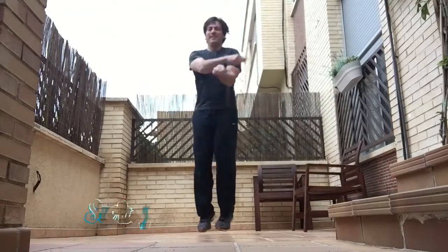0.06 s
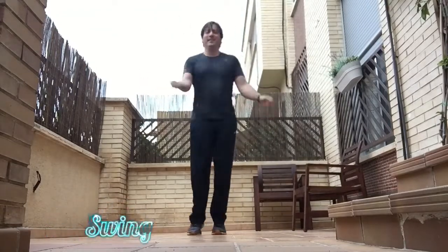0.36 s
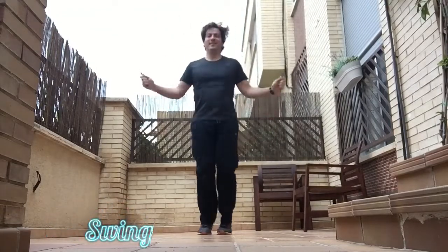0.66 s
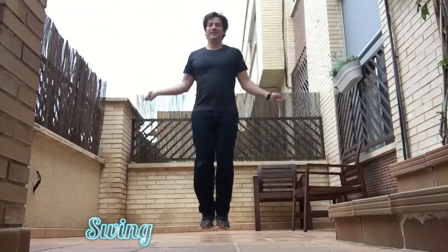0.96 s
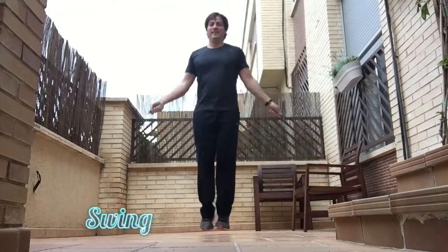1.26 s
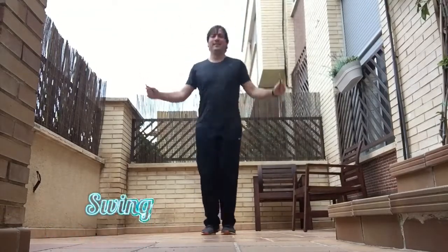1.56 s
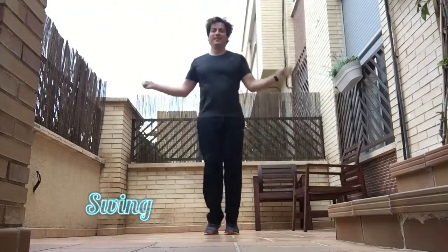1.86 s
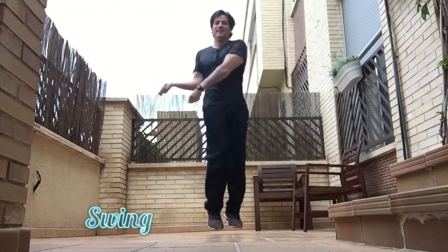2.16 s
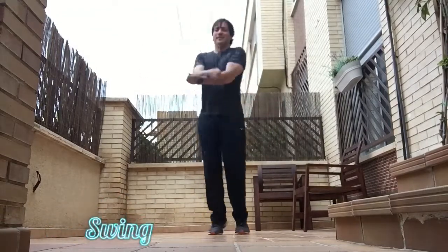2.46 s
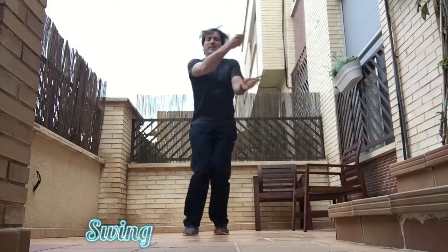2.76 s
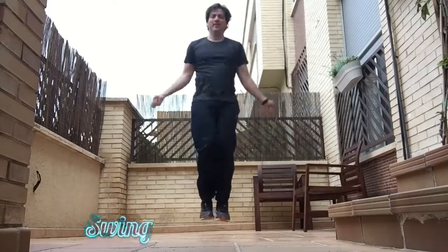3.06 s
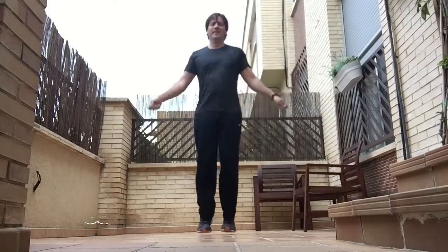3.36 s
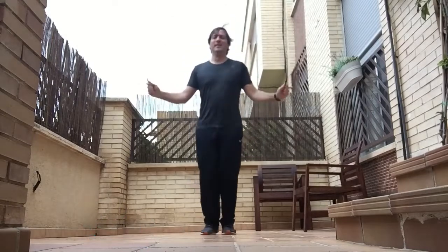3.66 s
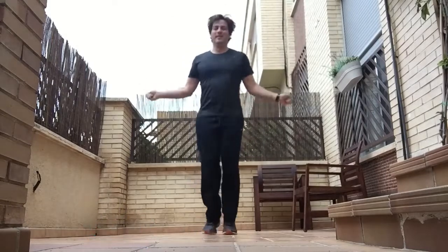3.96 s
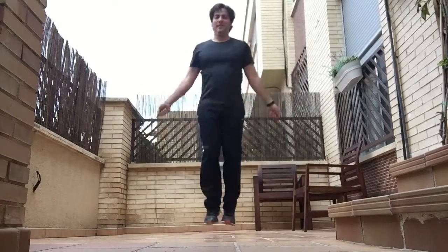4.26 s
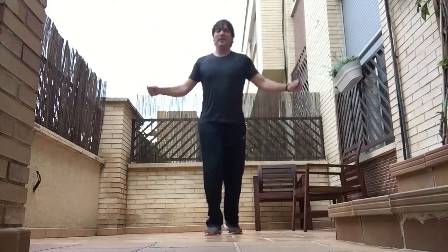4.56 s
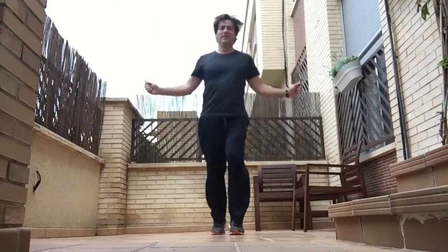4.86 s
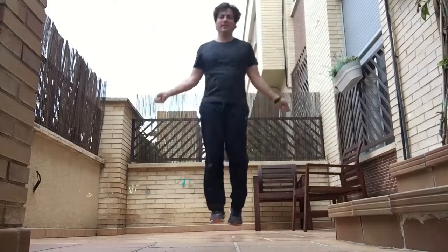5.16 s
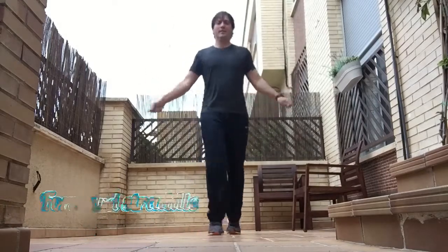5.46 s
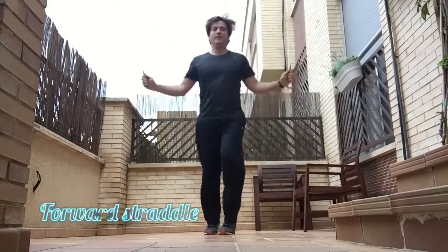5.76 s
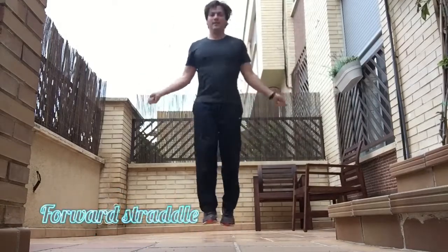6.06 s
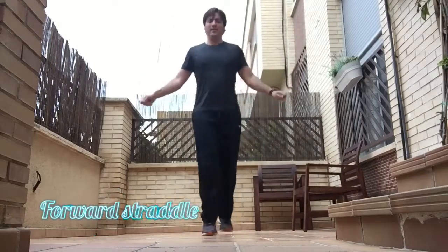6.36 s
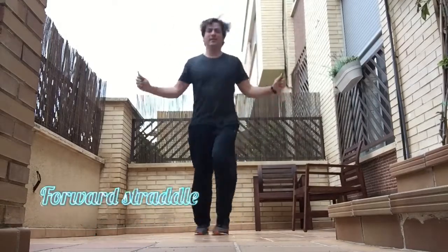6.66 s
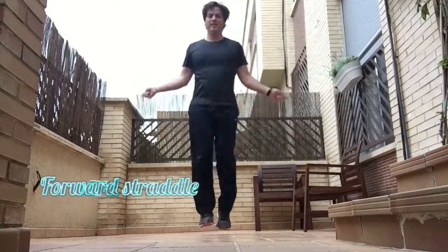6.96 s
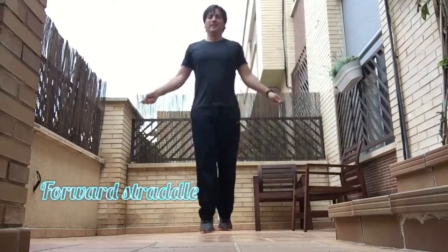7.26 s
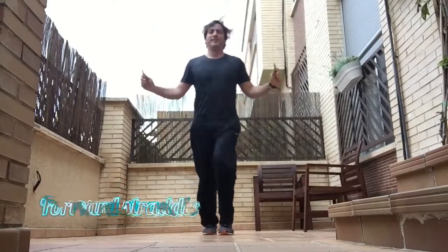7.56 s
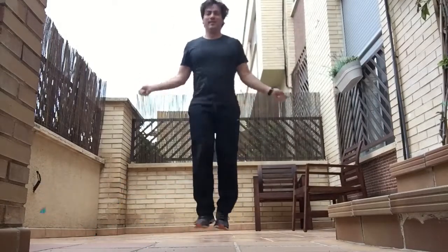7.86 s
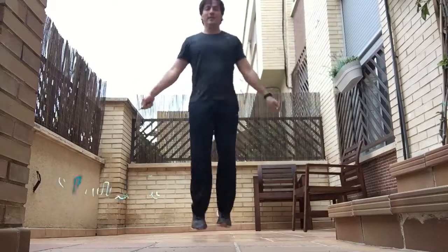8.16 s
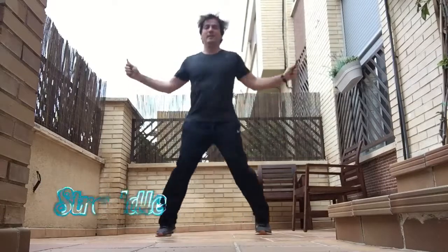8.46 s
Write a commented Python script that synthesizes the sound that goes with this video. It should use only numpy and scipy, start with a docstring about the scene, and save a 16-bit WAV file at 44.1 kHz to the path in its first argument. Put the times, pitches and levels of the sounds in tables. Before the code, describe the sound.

Someone skips rope on a tiled patio at a steady pace, a little over two turns a second. Each turn brings a breathy, whistling swish, a sharp tick on the tiles and the light thud of two shoes. One hard slap near the start jolts the microphone with a thump. Soles scuff and clothes rustle softly, brick walls return short echoes, and a faint town rumble and a few bird chirps lie far behind.

```python
"""A rope swishes round and ticks on a tiled patio, and two shoes land after each tick: someone is skipping.
The rope sings because it leaves tiny swirls in the air. Its hardest slap jolts the microphone.
Soles scuff, clothes rustle, and brick walls throw back short echoes.
Far away a town rumbles and small birds chirp."""
import sys
import numpy as np
from scipy import signal
from scipy.fft import rfft, irfft, next_fast_len
from scipy.io import wavfile
from scipy.ndimage import uniform_filter1d

SR = 44100
rng = np.random.default_rng(int(sys.argv[2]) if len(sys.argv) > 2 else 0)


def waveform_to_disk(signal):
    """Save audio, clipped to [-1, 1], as 16-bit WAV at the path in sys.argv[1]."""
    frames = np.transpose(np.atleast_2d(signal))
    scaled = np.clip(frames, -1, 1) * 32767
    samples = np.round(scaled).astype(np.int16)
    wavfile.write(sys.argv[1], SR, samples)


N = 384552


def amp(db):
    """Turn decibels into a gain."""
    return 10 ** (np.asarray(db) / 20)


def unit(x):
    """Scale a signal to an average (rms) level of 1."""
    return x / np.sqrt(np.mean(np.abs(x) ** 2) + 1e-20)


def along(points, hz):
    """Read between (freq_hz, value) points on a log frequency axis."""
    freqs, values = np.transpose(points)
    return np.interp(np.log(hz + 1), np.log(freqs), values)


def clock(length_s):
    """The time of each sample, in seconds."""
    return np.arange(int(length_s * SR)) / SR


def add(track, start_s, sound):
    """Mix a sound into a track."""
    part = track[round(start_s * SR):][:len(sound)]
    part += sound[:len(part)]


def bump(peak_s, rise_s, fall_s):
    """A smooth swell that reaches 1 at peak_s."""
    t = np.arange(-SR // 2, SR // 2) / SR
    out = np.zeros(N + SR)
    add(out, peak_s + .5, np.exp(-(t / np.where(t < 0, rise_s, fall_s)) ** 2))
    return out[SR:]


def noise(spectrum, size):
    """Noise with the given tone colour, at a level near 1."""
    padded = next_fast_len(size + 8192)
    gain = amp(along(spectrum, np.fft.rfftfreq(padded, 1 / SR)))
    return unit(irfft(rfft(rng.standard_normal(padded)) * gain, padded))[:size]


def colour(force, spectrum, size=4096):
    """Give a burst a tone colour and the energy of 4 ms at level 1."""
    # a minimum-phase filter: nothing sounds before the hit
    cepstrum = irfft(np.log(amp(along(spectrum, np.fft.rfftfreq(size, 1 / SR)))))
    response = irfft(np.exp(rfft(np.r_[cepstrum[0], 2 * cepstrum[1:size // 2]], size)))
    sound = signal.fftconvolve(force, response)
    return sound / np.linalg.norm(sound) * np.sqrt(.004 * SR)


# How long the walls' echoes last: freq_hz, fade_s (every fade_s is the time to drop by 60 dB)
WALL_FADES = [(150, 0.26), (700, 0.29), (3000, 0.27), (8000, 0.23), (15000, 0.2)]

def patio_echoes(build_s=0.0075, roughness=0.34, far_echo_s=0.13, far_echo_db=-33):
    """Near walls answer a click with a crowd of echoes; a far wall adds a weak one."""
    t = clock(.3)
    reflections = rng.standard_normal(len(t)) * np.exp(roughness * rng.standard_normal(len(t)))
    hz, frame_s, bands = signal.stft(reflections, SR, nperseg=256)
    fade = amp(-60 * frame_s / along(WALL_FADES, hz)[:, None])
    tail = signal.istft(bands * fade, SR, nperseg=256)[1][:len(t)]
    tail *= 1 - np.exp(-(t / build_s) ** 2)
    tail /= np.linalg.norm(tail)
    add(tail, far_echo_s, amp([far_echo_db]))
    return tail


def among_walls(sound, echo_db):
    """A sound together with its echoes."""
    response = amp(echo_db) * patio_echoes()
    response[0] = 1
    return signal.fftconvolve(sound, response)


def impact(contact, spectrum, echo_db):
    """A rough hit makes a burst of noise, and the walls answer in the same tone colour."""
    sound = amp(echo_db) * colour(patio_echoes(), spectrum)
    add(sound, 0, colour(contact * rng.standard_normal(len(contact)), spectrum))
    return sound


# Tone colour of the town: freq_hz, level_db
TOWN_COLOUR = [(20, -72), (35, -32), (55, -0.5), (75, -3.5), (160, -2.5), (300, -11.5), (600, -21),
               (1200, -11.5), (2500, -23.5), (5000, -27.5), (10000, -30.5), (16000, -31)]

def town(level_db=-51):
    """A steady rumble from far away."""
    return amp(level_db) * noise(TOWN_COLOUR, N)


# Far bird calls: start_s, start_hz, end_hz, length_s, level_db
BIRD_CHIRPS = [(3.627, 6760, 6430, 0.053, -61.5), (3.729, 7600, 8250, .06, -63.5),
               (4.1, 4850, 5140, 0.069, -66), (5.054, 6030, 6350, 0.08, -65),
               (5.459, 5110, 4845, 0.056, -64), (8.55, 6370, 6520, 0.036, -59)]

def birds(waver=0.019):
    """Thin sliding whistles, blurred by the walls."""
    out = np.zeros(N)
    for start_s, start_hz, end_hz, length_s, level_db in BIRD_CHIRPS:
        size = int(length_s * SR)
        wobble = unit(uniform_filter1d(rng.standard_normal(size), size=60))
        pitch_hz = np.linspace(start_hz, end_hz, size) * (1 + waver * wobble)
        whistle = np.hanning(size) * np.sin(2 * np.pi * np.cumsum(pitch_hz) / SR)
        add(out, start_s, amp(level_db) * among_walls(whistle, echo_db=-0.5))
    return out


# Tone colour of brushing clothes and soles: freq_hz, level_db
RUSTLE_COLOUR = [(500, -21), (1200, -5.5), (1700, 9.5), (2300, 6.5), (3200, 4.5), (7000, 0.5), (10000, 1),
                 (14000, -1), (16000, -18)]

def rustle(turns, level_db=-60, lead_s=0.051, rise_s=0.033, fall_s=0.25, scatter_db=1):
    """Clothes and soles brush softly as the jumper takes off ahead of the rope."""
    gains = amp(level_db + scatter_db * rng.standard_normal(len(turns)))
    swells = sum(gain * bump(down_s - lead_s, rise_s, fall_s) for gain, (down_s, *_) in zip(gains, turns))
    return noise(RUSTLE_COLOUR, N) * swells


# Tone colour of a push's thud: multiple_of_centre, level_db
PUSH_COLOUR = [(.2, -29), (.6, 0), (1, 3.5), (1.6, 0), (3, -17), (7, -47)]
# Tone colour of a scuffing sole: freq_hz, level_db
SCUFF_COLOUR = [(500, -2.5), (1500, 5.5), (3500, -8.5), (7000, -10.5), (16000, -26)]
# Feet pressing on the tiles: start_s, thud_db, centre_hz, scuff_db
FOOT_PUSHES = [(0.297, -51, 392, -57.5), (2.811, -43.5, 330, -53.5), (3.199, -38, 230, -64),
               (3.638, -50, 347, -67.5), (4.081, -47, 400, -54.5), (4.54, -42.5, 323, -52),
               (5.418, -48, 296, -50), (6.29, -57.5, 250, -56), (7.179, -47, 224, -73),
               (7.621, -39.5, 183, -75), (8.08, -40.5, 222, -58.5), (8.55, -39, 367, -49.5)]

def pushes(rise_s=0.018):
    """The jumper's weight sinks and pushes off with a dull thud and a light scuff."""
    out, t = np.zeros(N), clock(.2)
    press = t / rise_s * np.exp(1 - t / rise_s)
    for start_s, thud_db, centre_hz, scuff_db in FOOT_PUSHES:
        thud = amp(thud_db) * noise(np.multiply(PUSH_COLOUR, [centre_hz, 1]), len(t))
        scuff = amp(scuff_db) * noise(SCUFF_COLOUR, len(t))
        add(out, start_s, press * (thud + scuff))
    return out


# Tone colours of a sole's click, the grit under it and the foot's thud: freq_hz, level_db
CLICK_COLOUR = [(200, -23), (700, 3), (1600, 4), (3200, 1.5), (6000, -7), (10000, -19.5), (16000, -20.5)]
GRIT_COLOUR = [(1000, -14), (4000, -10.5), (7000, 1.5), (12000, 1.5), (16000, -11.5)]
THUD_COLOUR = [(30, -44.5), (80, -15), (165, 4), (300, -1), (480, 1.5), (750, 0), (1200, -12),
               (2500, -31.5), (8000, -81.5)]
# The second shoe's softer, grittier mix: click_change_db, thud_change_db, grit_change_db
SECOND_SHOE = (-2, -3, 0.86)
# Landings, one shoe after the other: start_s, click_db, thud_db, grit_db, second_after_s, second_gain_db
LANDINGS = [(0.1924, -50, -46, -63, .028, 9.5), (.654, -38.5, -40, -46, .0065, 5.5),
            (1.0475, -36, -35.5, -47, 0.0087, -7), (1.4728, -36, -33.5, -60, .0094, -14),
            (1.8788, -36, -31.5, -45, 0.011, -6.5), (2.2777, -41.5, -41, -48, .0104, 0.5),
            (2.7212, -42, -39.5, -52, .012, -5), (3.1837, -36.5, -33.5, -39.5, .0104, -2),
            (3.5817, -42, -37.5, -48.5, 0.0061, -1), (3.9957, -46.5, -39, -56, .0043, 5.5),
            (4.455, -38, -37, -43.5, .011, -2.5), (4.8955, -41.5, -36, -42.5, .01, -19),
            (5.3161, -46, -43.5, -71, .0422, 10), (5.7855, -45.5, -38, -48, 0.011, -0.5),
            (6.2245, -44, -41, -56, .011, 6), (6.6705, -41.5, -36.5, -50, .01, -6),
            (7.1015, -42.5, -37.5, -48, .0166, 2), (7.5349, -43.5, -37.5, -49, 0.016, -2.5),
            (7.9812, -43.5, -41.5, -60, .0094, 0.5), (8.4645, -42.5, -42, -50.5, .004, 4.5)]

def shoes(click_fade_s=0.014, thud_fade_s=0.041, click_gain_db=1, thud_gain_db=4, grit_gain_db=-1):
    """Each sole clicks on the gritty tile and the foot's weight thuds behind it."""
    out, t = np.zeros(N), clock(.04)
    hard, soft = amp(-60 * t / click_fade_s), amp(-60 * t / thud_fade_s)
    for start_s, *first, second_after_s, second_gain_db in LANDINGS:
        second = np.add(first, SECOND_SHOE) + second_gain_db
        for at_s, (click_db, thud_db, grit_db) in (start_s, first), (start_s + second_after_s, second):
            add(out, at_s, amp(click_db + click_gain_db) * impact(hard, CLICK_COLOUR, echo_db=2))
            add(out, at_s, amp(grit_db + grit_gain_db) * impact(hard, GRIT_COLOUR, echo_db=2))
            add(out, at_s, amp(thud_db + thud_gain_db) * impact(soft, THUD_COLOUR, echo_db=5))
    return out


def swirls(pitch_hz, width_hz, steady=0):
    """Swirling air makes a breathy note; steady (0 to 1) evens out its loudness."""
    hz = np.fft.fftfreq(next_fast_len(N), 1 / SR)
    rolloff = (1 + (hz / width_hz) ** 4) ** .5
    drift = np.fft.ifft(np.fft.fft(rng.standard_normal(len(hz))) / rolloff)[:N]
    drift /= np.abs(drift) ** steady
    return unit(np.real(drift * np.exp(2j * np.pi * np.cumsum(pitch_hz) / SR)))


# Tone colour of air rushing along the rope: freq_hz, level_db
AIR_COLOUR = [(500, -19), (1500, -6.5), (2600, -11), (4000, 1), (9000, 12), (16000, -25)]
CRUISE_HZ = 770  # the rope's pitch at cruising speed

def rope_tone(pitch_hz, strength, side_ratio=.86):
    """The loop's fast tip sheds swirls that sing with faint overtones; its slower sides sing lower."""
    tip = amp(-1) * swirls(pitch_hz, width_hz=40, steady=.4)
    sides = amp(-7) * swirls(side_ratio * pitch_hz, width_hz=96)
    overtones = amp(-20) * swirls(2 * pitch_hz, width_hz=350)
    overtones += amp(-26) * swirls(3 * pitch_hz, width_hz=250)
    hiss_db = -28 + 35 * np.log10(pitch_hz / CRUISE_HZ)  # a faster rope hisses much more
    hiss = amp(hiss_db) * noise(AIR_COLOUR, N)
    return strength * (tip + sides + overtones + hiss)


def swings(rows, rise_s, fall_s, slide_s=.065):
    """In each swing the rope's tone swells and fades while its pitch slides, then levels off."""
    t = np.arange(N) / SR
    peak_s, hz, slide_hz_per_s, _ = np.transpose(rows)
    nearest = np.searchsorted((peak_s[1:] + peak_s[:-1]) / 2, t)
    bend_hz = slide_hz_per_s[nearest] * slide_s * np.tanh((t - peak_s[nearest]) / slide_s)
    strength = sum(amp(db) * bump(at_s, rise_s, fall_s) for at_s, _, _, db in rows)
    return rope_tone(hz[nearest] + bend_hz, strength)


# Turns of the rope, each a swing down and a swing up:
# down_s, down_pitch_hz, down_slide_hz_per_s, down_db, up_after_s, up_pitch_hz, up_db
ROPE_TURNS = [(.045, 752.6, -500, -42.5, .105, 690, -40.5), (.466, 982, 3007, -37, .11, 1000, -38.5),
              (.871, 756, -2000, -38.5, .155, 725, -40), (1.294, 901, -500, -39.5, .15, 860, -40.5),
              (1.705, 824, -100, -37, 0.12, 890, -42), (2.159, 742.5, 103, -37, 0.13, 750, -42.5),
              (2.595, 653.6, -1500, -44, 0.079, 710, -39), (3.015, 859, -1000, -40, .135, 1090, -34.5),
              (3.423, 820, -1000, -40.5, .14, 800, -40), (3.836, 878, -1000, -38, .145, 790, -44),
              (4.233, 929.5, -500, -38, .135, 775, -39), (4.674, 795, -700, -41, .155, 735, -43.5),
              (5.117, 842, 100, -41, 0.14, 740, -44), (5.548, 834.5, -1000, -41.5, .16, 770, -41.5),
              (6.015, 725, -500, -43.5, .145, 705, -45), (6.471, 774, -800, -42.5, .15, 720, -45.5),
              (6.91, 840, -700, -45, 0.11, 705, -38), (7.347, 815, 491.5, -41.5, 0.12, 692, -42),
              (7.797, 801, -100, -42, 0.14, 742, -44), (8.235, 863, -500, -39.5, .125, 748, -42.5)]

def rope_swish(settle_s=.08, overhead_after_s=0.25, overhead_hz=653, overhead_db=-53):
    """The rope sings on the way down, again on the way up, and softly as it passes overhead."""
    down = [turn[:4] for turn in ROPE_TURNS]
    # every upswing slides towards the cruising pitch
    up = [(s + after_s, hz, (CRUISE_HZ - hz) / settle_s, db) for s, *_, after_s, hz, db in ROPE_TURNS]
    overhead = sum(bump(s + overhead_after_s, rise_s=0.15, fall_s=0.15) for s, *_ in ROPE_TURNS)
    hum = amp(overhead_db) * overhead * swirls(np.full(N, overhead_hz), width_hz=55)
    down_tone = swings(down, rise_s=0.044, fall_s=0.055)
    up_tone = swings(up, rise_s=0.033, fall_s=0.049)
    return among_walls(down_tone + up_tone + hum, echo_db=-6)[:N]


# Notes that ring after a slap: pitch_hz, level_db, fade_s
RING_NOTES = [(1320, -12.5, 0.19), (2014, -14.5, 0.12), (2187, -15, .18), (2480, -24.5, 0.22)]

def slap_ring(scatter_db=2):
    """A few short notes, each a little louder or softer at every slap."""
    t = clock(.2)
    return sum(amp(db + scatter_db * rng.standard_normal() - 60 * t / fade_s) * np.sin(2 * np.pi * hz * t)
               for hz, db, fade_s in RING_NOTES)


# Tone colours of a slap's bright tick and its fuller body: freq_hz, level_db
TICK_COLOUR = [(500, -39), (2500, -18.5), (5000, -12), (8000, -6), (11000, -2), (15000, 3.5),
               (17000, -25.5)]
BODY_COLOUR = [(100, -29.5), (400, 3.5), (1000, 2), (2200, 3), (3300, 0), (5000, -3.5), (9000, -7.5),
               (16000, -24)]
# The rope hitting the tiles: start_s, level_db, body_gain_db, echo_db
ROPE_SLAPS = [(0.0754, -32.5, -14.5, -1), (0.4891, -12.5, -13.5, -5), (0.924, -27.5, -4.5, 1.5),
              (0.948, -34.5, -24, -3), (1.324, -24.5, -10, 1.7), (1.734, -19.5, -17, -2),
              (2.184, -33, -7, -0.5), (2.6292, -29, -14, 2.5), (3.0528, -19.5, -14, -3.1),
              (3.4603, -22.5, -13.5, -4.5), (3.469, -36.5, 0.5, 0), (3.8687, -22.5, -15, -3.5),
              (4.2704, -23, -12.5, -3), (4.7103, -23, -18, -0.5), (4.7247, -35, -9, 5),
              (4.7539, -27.5, -21, -1), (5.1541, -25.5, -15.5, -2.5), (5.1705, -26.5, -12, 0),
              (5.5823, -26, -12, -1.5), (5.5977, -39.5, -9, 2.5), (6.055, -28.5, -8.5, 3.5),
              (6.0616, -24.5, -5, -1.5), (6.5131, -33, -9.5, 5.5), (6.522, -27.5, -10, -15.5),
              (6.9457, -23.5, -19.5, -2), (6.963, -23.5, -3, -6), (7.3802, -23.5, -35.5, -7),
              (7.824, -22, -21.5, -5), (8.2605, -21.5, -18, -6.5)]

def rope_slaps(crack_fade_s=0.0014, rattle_fade_s=0.021, rattle_db=-8, tick_gain_db=1, body_echo_db=4):
    """The rope cracks on the tile, then a length of it lies down in a short rattle."""
    out, t = np.zeros(N), clock(.02)
    contact = amp(-60 * t / crack_fade_s) + amp(rattle_db - 60 * t / rattle_fade_s)
    for start_s, level_db, body_gain_db, echo_db in ROPE_SLAPS:
        body_gain = amp(level_db + body_gain_db)
        add(out, start_s, amp(level_db + tick_gain_db) * impact(contact, TICK_COLOUR, echo_db))
        add(out, start_s, body_gain * impact(contact, BODY_COLOUR, echo_db + body_echo_db))
        add(out, start_s, body_gain * slap_ring())
    return out


def jolt(start_s=.4903, level_db=-6, drop_hz=950, rest_hz=70, drop_s=0.0016, fade_s=.055):
    """The hardest slap jolts the microphone: a thump whose pitch drops at once."""
    out, t = np.zeros(N), clock(.15)
    cycles = rest_hz * t + drop_hz * drop_s * (1 - np.exp(-t / drop_s))
    add(out, start_s, amp(level_db - 60 * t / fade_s) * np.sin(2 * np.pi * cycles))
    return out


def scene():
    """The rope, the jumper and the far background, mixed into one channel."""
    skipping = rope_slaps() + jolt() + shoes() + pushes() + rustle(ROPE_TURNS) + rope_swish()
    return (skipping + birds() + town())[None]


def reduce_hiss(sound, depth_db=-9, margin_db=3):
    """Turn down patches of treble that are close to their band's quiet level."""
    hz, _, bands = signal.stft(sound, SR, nperseg=512)
    power = uniform_filter1d(np.abs(bands) ** 2, size=3, axis=-1)  # smooth over time
    power = np.abs(uniform_filter1d(power, size=2, axis=-2))  # and over frequency
    quiet = uniform_filter1d(np.quantile(power, .2, axis=-1, keepdims=True), size=9, axis=-2)
    hiss_share = 1 / (1 + (power / (quiet * amp(margin_db) ** 2 + 1e-20)) ** 2)
    treble = along([(600, 0), (1500, 1)], hz)[:, None]
    return signal.istft(bands * amp(depth_db * treble * hiss_share), SR, nperseg=512)[1][..., :N]


def record(dry):
    """The camera turns down quiet hiss, flattens peaks at full scale and cuts the highest treble."""
    limited = np.clip(reduce_hiss(dry), -1, 1)
    lowpass = signal.firwin(201, cutoff=16250, fs=SR, window=("kaiser", 7))
    return signal.fftconvolve(limited, lowpass[None], mode="same", axes=1)


dry = scene()
out = record(dry)
waveform_to_disk(out)
```